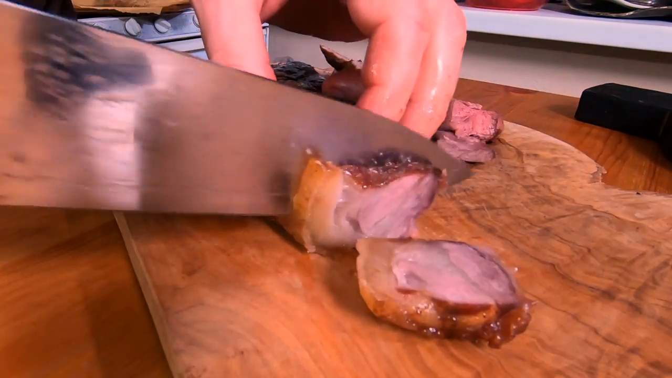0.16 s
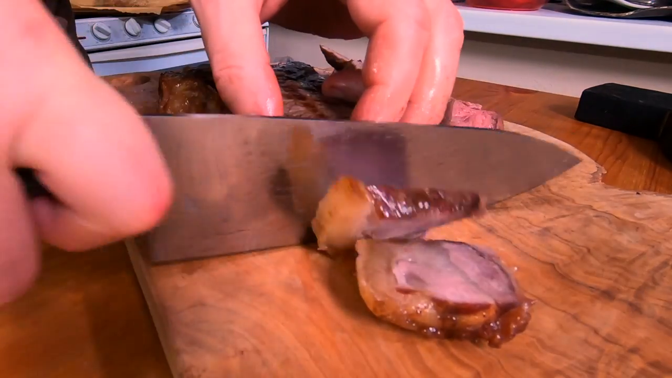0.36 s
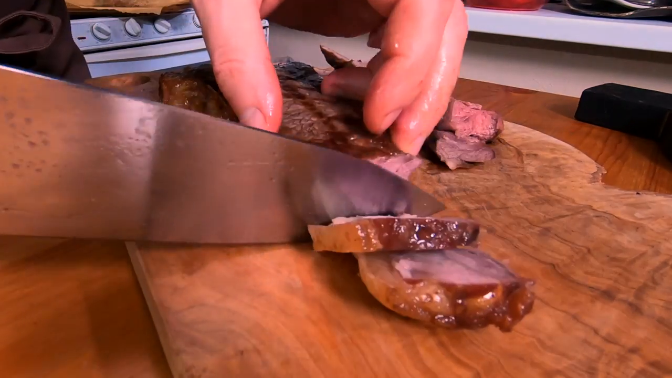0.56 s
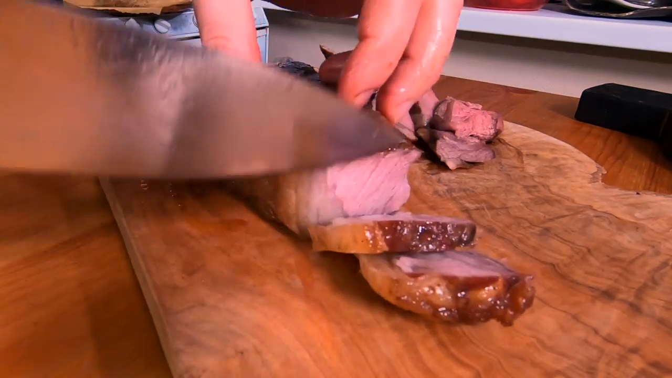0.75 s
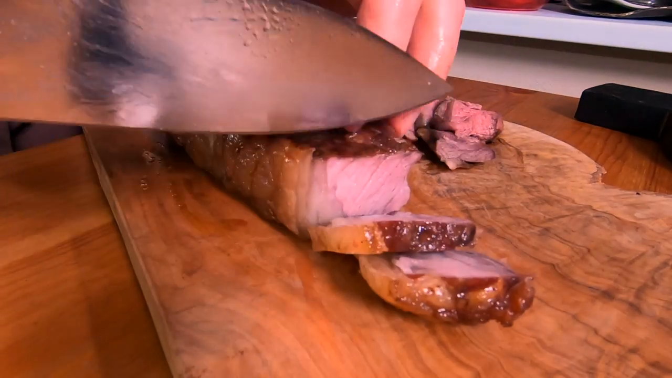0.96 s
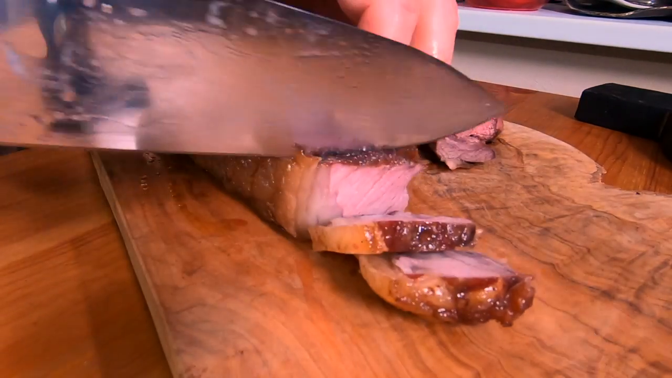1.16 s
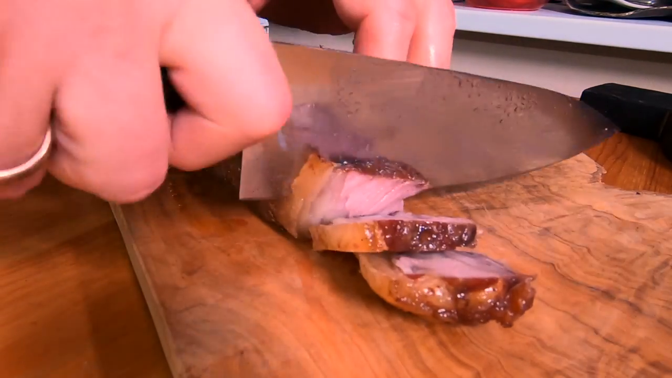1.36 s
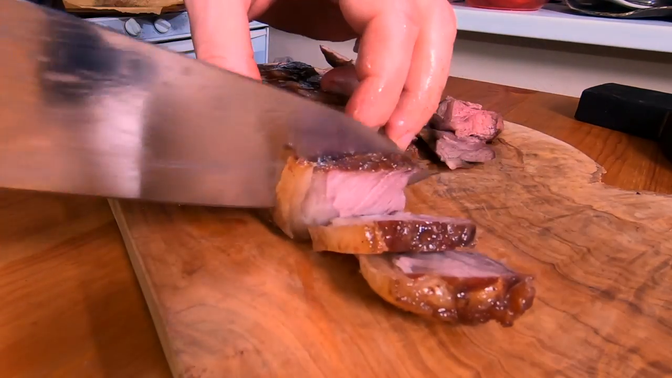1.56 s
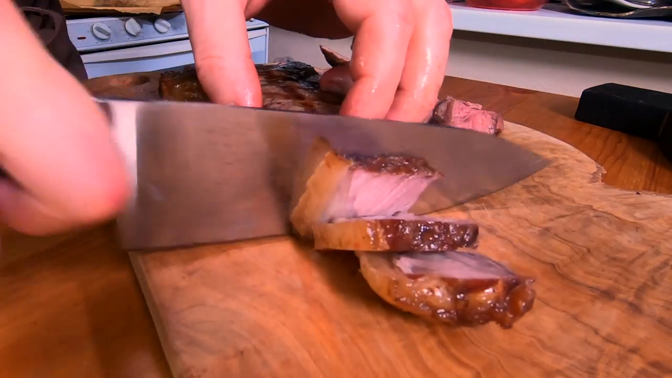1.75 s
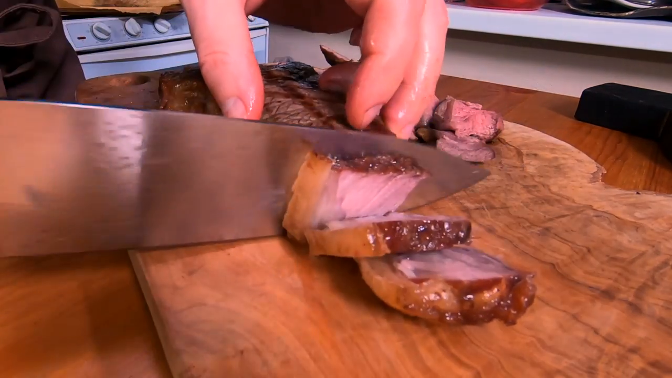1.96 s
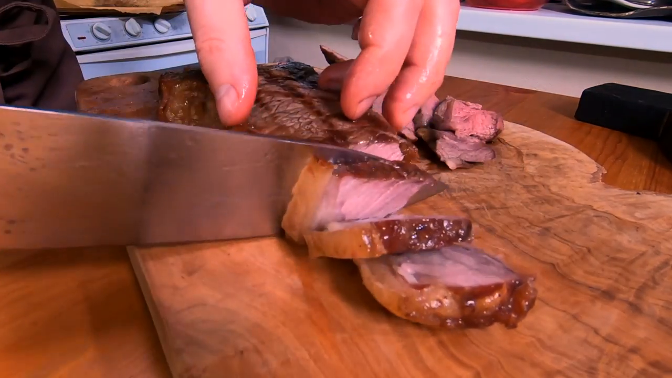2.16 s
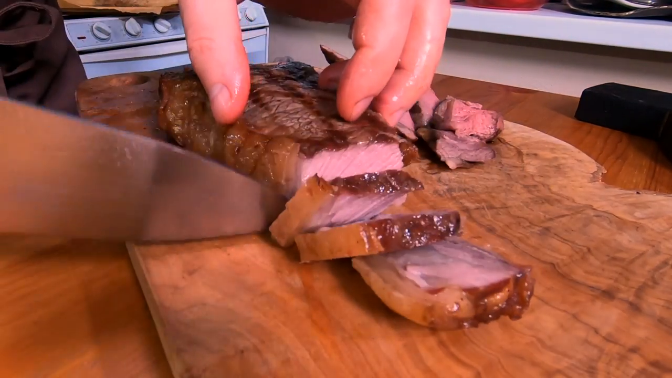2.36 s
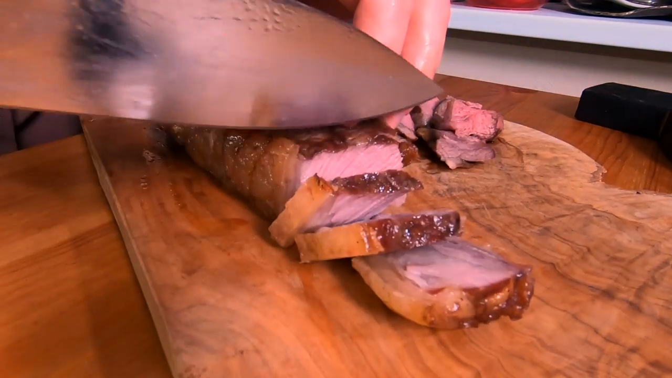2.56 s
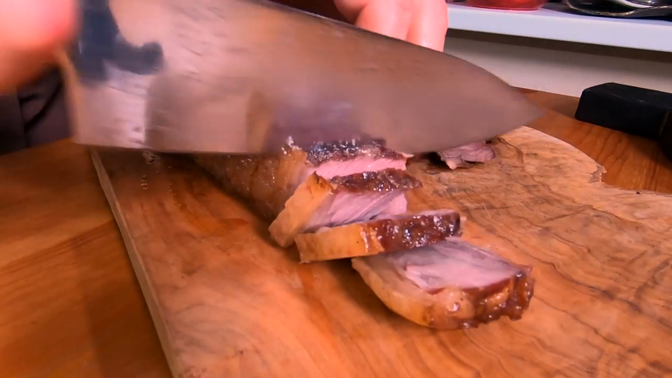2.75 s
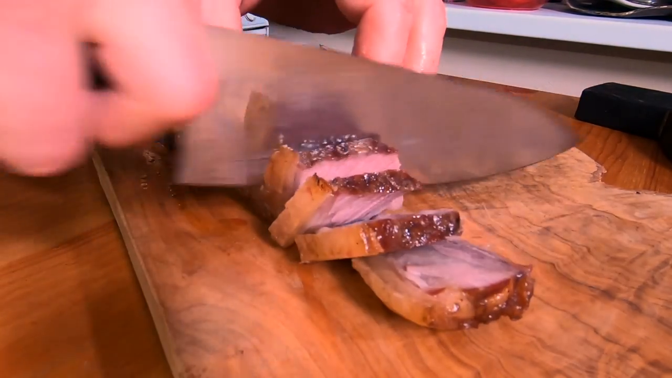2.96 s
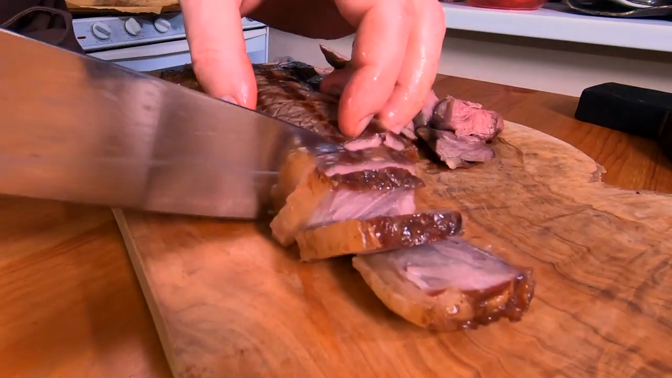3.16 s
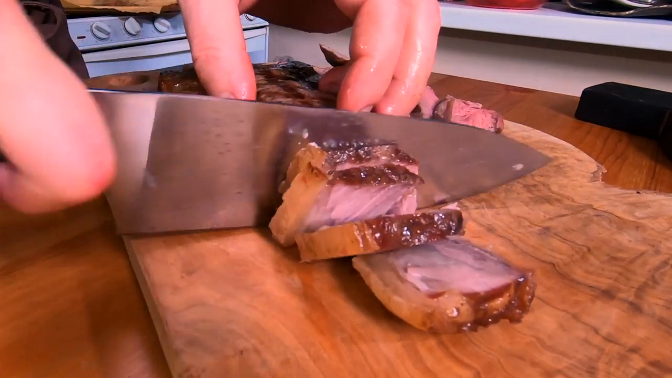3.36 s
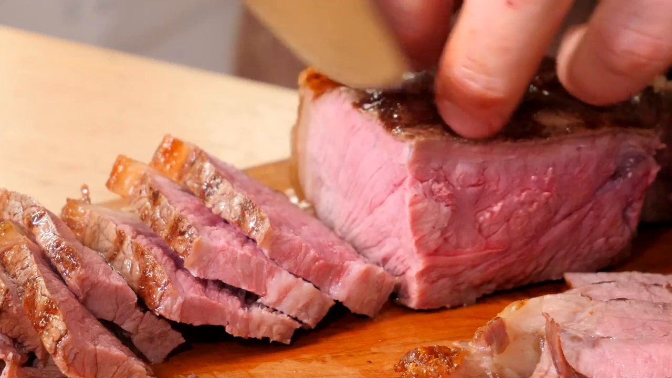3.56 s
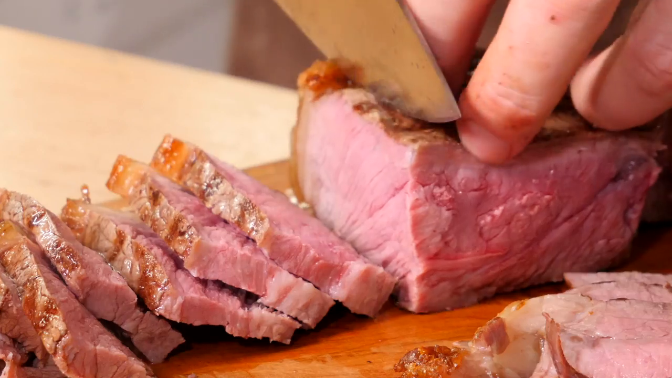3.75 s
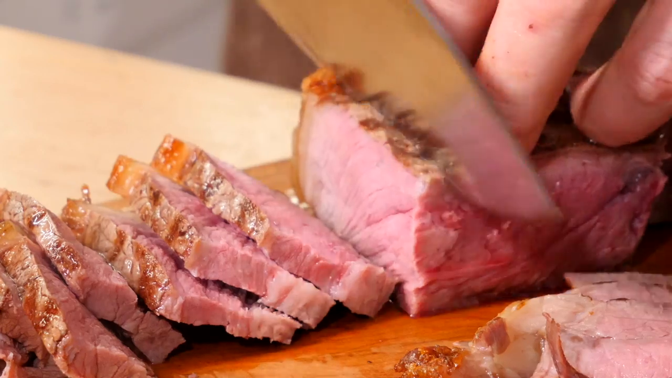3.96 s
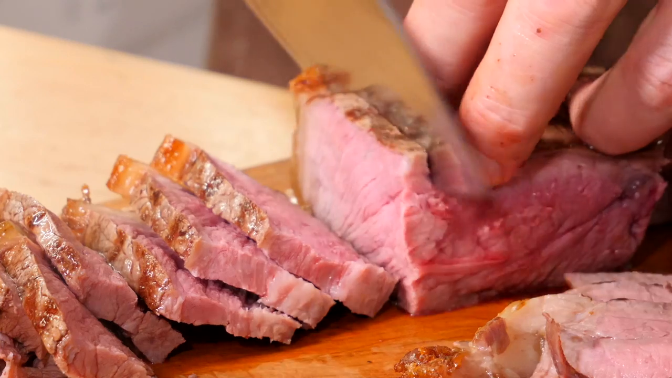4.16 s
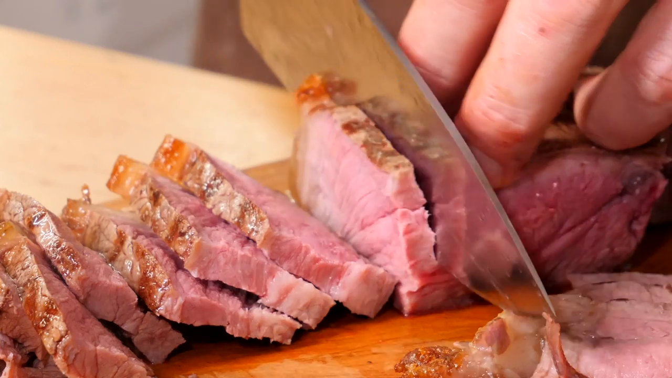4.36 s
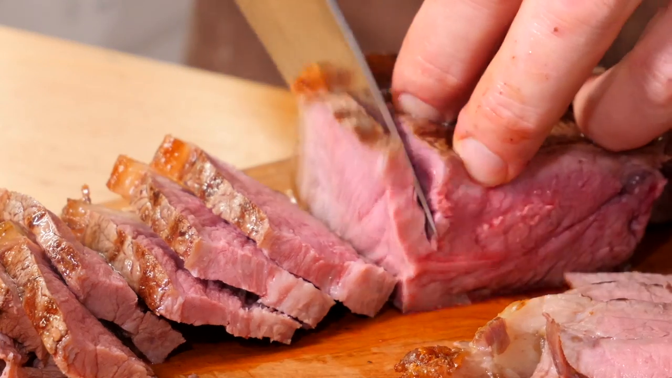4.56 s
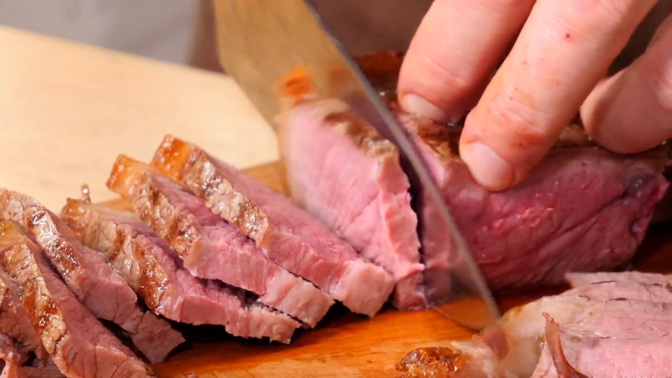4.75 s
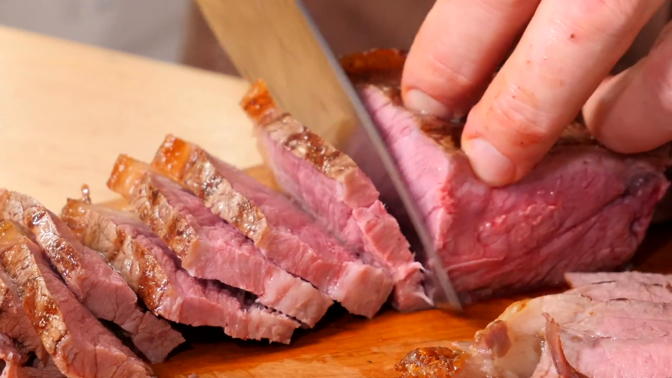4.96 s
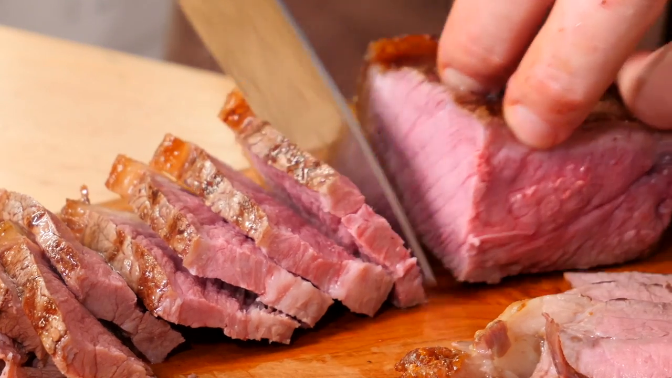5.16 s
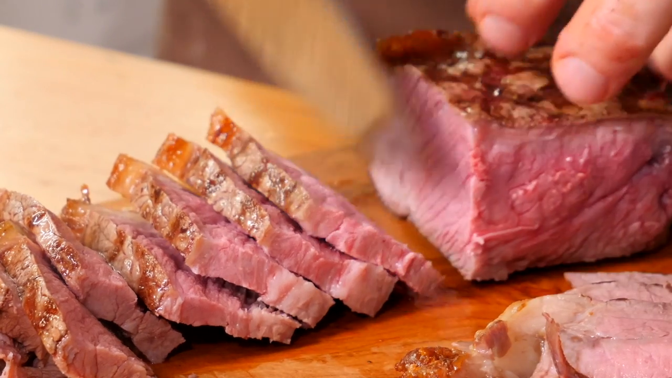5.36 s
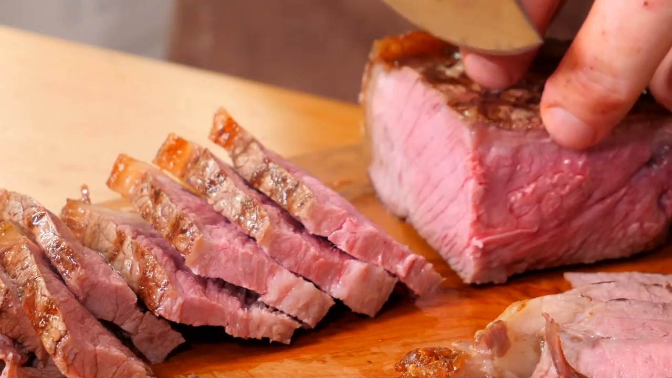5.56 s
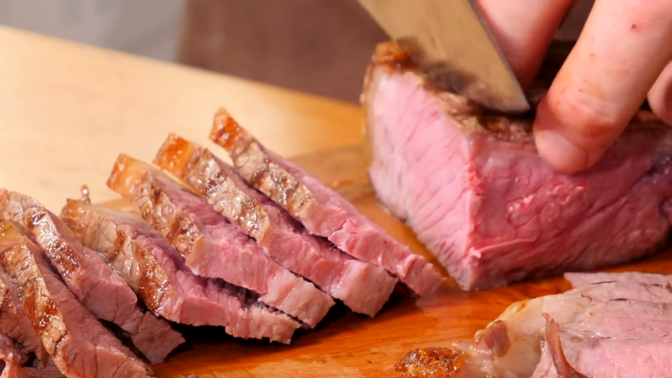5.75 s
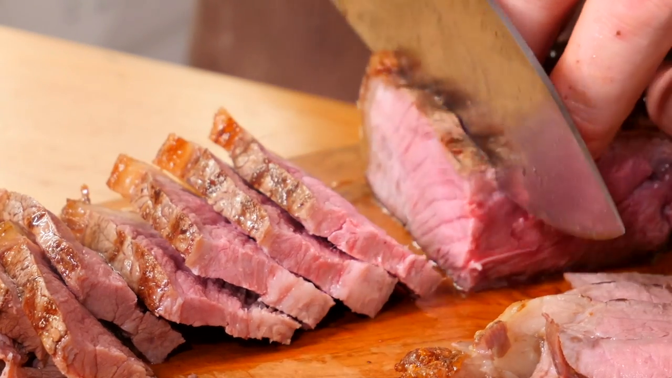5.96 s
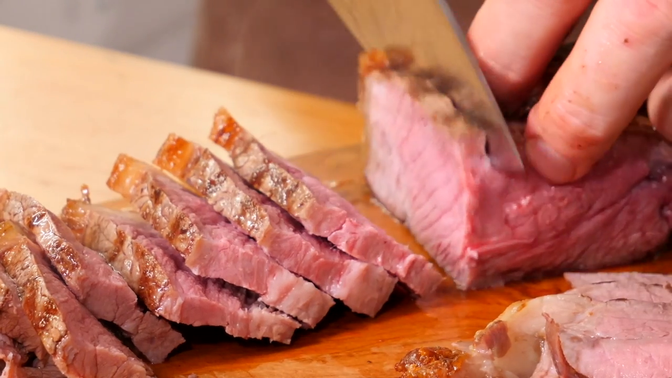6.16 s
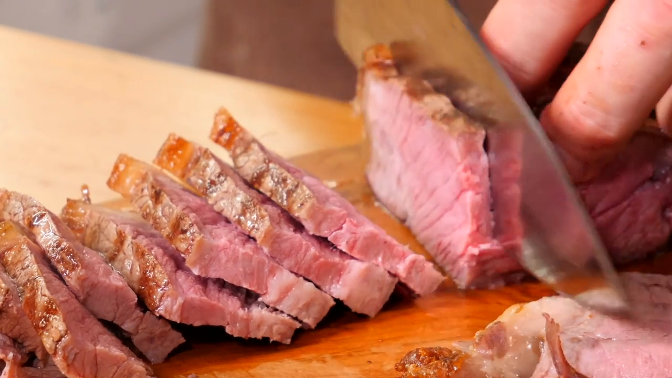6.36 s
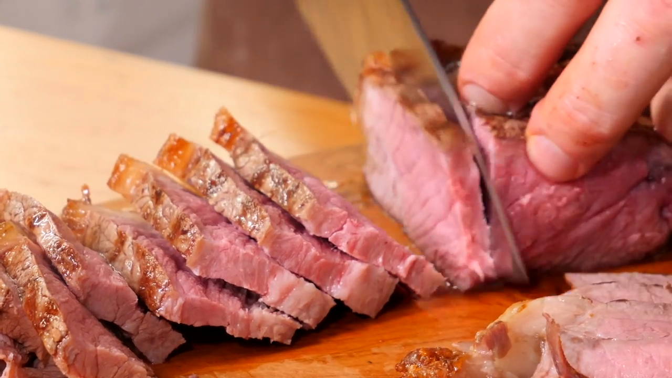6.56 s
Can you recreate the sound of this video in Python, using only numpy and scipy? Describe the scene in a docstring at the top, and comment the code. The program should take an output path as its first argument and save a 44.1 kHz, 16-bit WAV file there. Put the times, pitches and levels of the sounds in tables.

```python
"""A large knife saws through a cooked steak on a wooden board in a quiet kitchen.
From the first stroke the steel hisses in the wet meat, the edge rasps on the wood, and the pushing
hand makes the board rumble and thud. At 0.37 s the edge lands with a hard knock, then squeaks;
more knocks and squeaks follow. From 1.4 s fibres of the crust snap, thickest in two bouts of
harder sawing, at 4-4.8 s and, after a short rest, from 5.8 s to the end."""
import sys
import numpy as np
from scipy import signal
from scipy.io import wavfile
from scipy.ndimage import uniform_filter1d

SR = 44100
rng = np.random.default_rng(int(sys.argv[2]) if len(sys.argv) > 2 else 0)


def log_audio(samples):
    """Write samples as a 16-bit WAV file to the path given in sys.argv[1]."""
    # one column per channel
    frames = np.atleast_2d(samples).T
    # limit to full scale, then quantise
    limited = np.clip(frames, -1, 1)
    pcm = np.round(limited * 32767).astype(np.int16)
    wavfile.write(sys.argv[1], SR, pcm)


N = 290688

# strokes of the knife: start_s, speed_up_s, slow_down_s, hiss_db, pitch_hz, dull_db, drag_db, push_db,
# peakedness (0.3 even, 2 pointed)
KNIFE_STROKES = [(0, 0.16, 0.055, -51.5, 10800, -62, -60, -54.5, 0.5),
                 (.208, 0.16, 0.0093, -44, 11300, -49.5, -55.5, -46, 0.7),
                 (.44, 0.055, 0.14, -50.5, 10500, -61, -44, -52, 0.79),
                 (.69, 0.044, 0.068, -52.5, 9750, -58, -53, -49, 1.1),
                 (1.12, .15, .05, -63, 11900, -72, -84, -71.5, 0.64),
                 (1.291, 0.12, 0.066, -46, 10600, -58, -59, -53.5, 1.3),
                 (1.485, .065, 0.053, -51.5, 10600, -63, -78, -69, 0.43),
                 (1.604, 0.027, 0.1, -46, 10900, -76, -58, -55, 1.2),
                 (1.714, 0.071, 0.14, -44, 11100, -49.5, -53.5, -44, 0.77),
                 (1.933, 0.069, 0.13, -50, 10700, -68, -41, -52.5, .8),
                 (2.311, 0.0065, 0.13, -53.5, 11100, -59, -54, -55, 0.6),
                 (2.57, 0.032, 0.17, -65.5, 9300, -60, -66, -76, 0.48),
                 (2.809, 0.16, 0.049, -49.5, 10700, -58.5, -87, -53.5, 0.77),
                 (3.028, 0.066, 0.13, -49, 10600, -55.5, -54, -56.5, 0.23),
                 (3.234, 0.029, 0.2, -50, 10600, -56, -48, -44.5, .8),
                 (3.445, 0.12, 0.16, -51.5, 9900, -63, -44, -58, 0.7),
                 (3.92, 0.014, 0.077, -52.5, 12900, -60, -75, -51, .4),
                 (4.0, 0.048, 0.099, -42.5, 10700, -49, -65, -49.5, 1.7),
                 (4.146, 0.081, 0.088, -44, 11200, -44.5, -56, -43.5, 0.69),
                 (4.327, 0.0057, .128, -39.5, 11400, -45.5, -55.5, -40, 1),
                 (4.487, 0.1, 0.046, -48.5, 10000, -56, -65, -48, 0.21),
                 (4.65, 0.048, 0.031, -42.5, 9500, -64, -59, -44, .7),
                 (4.707, 0.016, 0.081, -38, 9800, -41, -45, -38, 1.2),
                 (4.813, 0.018, 0.13, -51.5, 9500, -47.5, -40, -58, 1.3),
                 (4.994, 0.041, 0.093, -54, 11400, -51.5, -47, -47.5, 0.65),
                 (5.134, 0.043, 0.16, -55, 11200, -57, -48, -56, 0.93),
                 (5.832, .17, 0.06, -45.5, 11200, -47.5, -65, -48, 1),
                 (6.09, 0.1, 0.039, -38.5, 10400, -42.5, -61.5, -48.5, 0.37),
                 (6.253, 0.015, .14, -38, 10700, -42.5, -55, -42, 0.78),
                 (6.39, 0.1, 0.11, -39, 10500, -53, -51, -44.5, 0.66)]
# modes of the wooden board, lowest first: pitch_hz, level_db, t60_s
BOARD_MODES = [(133.5, -17, 0.27), (176, -6.5, 0.089), (213, -2.5, 0.13), (359, -16.5, 0.1),
               (520, -16.5, 0.084), (592.4, -12.5, 0.067), (713, -13.5, 0.13), (815, -7, 0.05),
               (947, 4.5, 0.015), (962, -18, 0.067), (1080, -10.5, 0.031), (1120, -8, 0.017),
               (1480, -30, 0.052), (1603, -7.5, 0.028), (1660, -13, .05), (2400, -19, 0.0245)]
# crust fibres breaking: start_s, level_db, brightest_hz, thump_db (relative to the level)
FIBRE_SNAPS = [(1.423, -23, 10600, -17.5), (1.636, -30, 11200, -14), (2.677, -40, 9100, -15),
               (2.934, -32.5, 10600, -7), (3.067, -31, 11700, -30), (3.701, -42, 9700, -10),
               (3.929, -35, 12300, -27), (4.0663, -17, 10600, -38), (4.1535, -28.5, 11000, -29),
               (4.177, -22, 11000, -35), (4.232, -16.5, 12200, -25), (4.2653, -18, 13900, -11),
               (4.337, -11, 11700, -16), (4.363, -15.5, 12100, -36), (4.4048, -35, 10300, -12),
               (4.4194, -23, 10600, -21), (4.4328, -23.5, 10600, -30), (4.4428, -21.5, 10600, -23),
               (4.501, -32, 10100, -11), (4.6127, -24.5, 6500, -18), (4.626, -31, 9000, -11),
               (4.6924, -12.5, 8750, -20), (4.6958, -21, 8700, -26), (4.721, -13, 10700, -32),
               (4.843, -31, 3160, -20), (5.8346, -37, 5600, -25), (5.854, -35, 12200, -12),
               (5.887, -33, 7600, -8), (5.8962, -28.5, 13600, -14), (5.9678, -19.5, 10900, -26),
               (5.998, -19.5, 12200, -15), (6.0117, -17.5, 12200, -15.5), (6.03, -26.5, 10700, -13),
               (6.1097, -30, 10640, -5.5), (6.225, -38, 9500, -12), (6.264, -24, 12300, -8),
               (6.33, -29, 10800, -24), (6.3682, -8.5, 10600, -15), (6.3754, -27, 10900, -18),
               (6.3823, -13.5, 10600, -34), (6.413, -15.5, 10600, -9.5), (6.4426, -15.5, 10500, -43),
               (6.4546, -17, 10700, -33), (6.4803, -11.5, 10500, -22), (6.554, -17.5, 12400, -16)]


def from_db(db):
    """Decibels to gain."""
    return 10 ** (np.asarray(db) / 20)


def rms_one(x):
    """Scale to rms 1."""
    return x / np.sqrt(np.mean(x ** 2) + 1e-20)


def band(x, low_hz, high_hz):
    """Butterworth band-pass."""
    edges_hz = [low_hz, min(high_hz, .45 * SR)]
    return signal.sosfilt(signal.butter(2, edges_hz, "band", fs=SR, output="sos"), x)


def drift(rate_hz):
    """Smooth random wander of rms 1."""
    r = np.exp(-80 * np.pi * rate_hz / SR)
    slow = signal.lfilter([1], [1, -2 * r, r * r], rng.standard_normal(N // 40 + 2002))[2000:]
    return np.interp(np.arange(N) / 40, np.arange(len(slow)), rms_one(slow))


def ring(x, hz, t60):
    """One mode: a unit click starts a decaying sine of height 1."""
    r, w = from_db(-60 / (t60 * SR)), 2 * np.pi * hz / SR
    return signal.lfilter([0, np.sin(w)], [1, -2 * r * np.cos(w), r * r], x + 1e-18)


def resonance(x, hz, width_hz):
    """Two-pole peak of gain 1."""
    r, w = np.exp(-np.pi * width_hz / SR), 2 * np.pi * hz / SR
    return signal.lfilter([(1 - r * r) / 2, 0, (r * r - 1) / 2], [1, -2 * r * np.cos(w), r * r], x)


def linger(power, seconds):
    """One-pole smoothing that gives an envelope a tail."""
    keep = np.exp(-1 / (seconds * SR))
    return signal.lfilter([1 - keep], [1, -keep], power)


def friction(slips_per_s, spread_db, smooth):
    """Tiny stick-slip clicks over a smooth rub, as two independent streams."""
    sizes = from_db(spread_db * np.minimum(rng.exponential(1, (2, N)), 5))
    signs = rng.choice([-1, 1], (2, N))
    slips = sizes * signs * (rng.random((2, N)) < slips_per_s / SR)
    return rms_one(slips) + smooth * rng.standard_normal((2, N))


def room_tone(level_db=-55, flicker_db=1.5):
    """Room and preamp noise in third-octave bands, each flickering on its own."""
    # noise floor: frequency_hz, density_db
    spectrum = [(15, -31), (25, 1.5), (170, -6), (222, -3.5), (291, -5), (403, -6.5), (637, -5),
                (834, -8.5), (929, -10), (15800, -25.5)]
    hz, db = np.transpose(spectrum)
    edges = np.geomspace(hz[0], hz[-1], round(3 * np.log2(hz[-1] / hz[0])) + 1)
    out, noise = np.zeros(N), rng.standard_normal((2, N))
    for k, (low, high) in enumerate(zip(edges, edges[1:])):
        band_db = np.interp(np.log(low * high) / 2, np.log(hz), db)
        out += from_db(band_db + flicker_db * drift(8.1)) * band(noise[k % 2], low, high)
    return from_db(level_db) * rms_one(out)


def sawing_motion():
    """Hiss, drag and push swell with each stroke's speed; the loudest stroke leads the pitch."""
    cut_s = 3.598   # the sawing sound cuts off abruptly here, at an edit
    resting_drag_db, resting_push_db = -79.5, -59.5   # hand and blade never lie quite still
    powers = np.full((5, N), 1e-12)
    for start, up, down, hiss_db, hz, dull_db, drag_db, push_db, peakedness in KNIFE_STROKES:
        end = start + up + down
        heard_until = min(end, cut_s) if start < cut_s else end
        span = np.arange(max(round(start * SR), 0), min(round(heard_until * SR), N))
        progress = np.interp(span / SR, [start, start + up, end], [0, .5, 1])
        speed = np.abs(np.sin(np.pi * progress))
        heights = from_db(2 * np.array([hiss_db, hiss_db, dull_db, drag_db, push_db]))
        heights[1] *= hz   # pitch weighted by hiss power
        powers[:, span] += heights[:, None] * speed ** (2 * peakedness)
    hiss, weighted_pitch, dull = linger(powers[:3], seconds=0.004)
    sings_hz = weighted_pitch / hiss
    tears = tearing_power()
    hiss += tears
    dull += from_db(2 * -8) * tears   # the dull part of a tear is 8 dB softer
    drag = linger(powers[3], seconds=0.024)   # the wood rings on after the edge slows
    drag[round(cut_s * SR):round((cut_s + .3) * SR)] = 0
    drag += from_db(2 * resting_drag_db)
    push = linger(powers[4], seconds=0.043) + from_db(2 * resting_push_db)
    hiss_db, dull_db, drag_db, push_db = 10 * np.log10([hiss, dull, drag, push])
    return hiss_db, sings_hz, dull_db, drag_db, push_db


def blade(x, sings_hz, boost_db=11.5):
    """Broad steel resonances over a flat rustle; those near the free length's pitch sing out."""
    # resonances of the steel: pitch_hz, width_hz, level_db
    steel_modes = [(7730, 550, -7.5), (8400, 196, -16), (9500, 200, -11), (10600, 730, -8),
                   (12050, 290, -5), (13100, 370, -30), (15400, 320, -40)]
    out = .27 * band(x, 6500, 17000)
    for hz, width, db in steel_modes:
        near_db = boost_db * np.exp(-((hz - sings_hz) / 900) ** 2)
        out += from_db(db + near_db + 4.5 * drift(16)) * resonance(x, hz, width)
    return out


def slicing(hiss_db, sings_hz, dull_db):
    """Steel rubs through wet meat; its lower modes come and go as the meat's grip shifts."""
    # lower resonances of blade and meat: pitch_hz, width_hz, level_db
    dull_modes = [(2170, 260, 12), (3250, 2200, 4), (4630, 100, 6.5), (4960, 80, 7), (5830, 2100, 16),
                  (6900, 270, -10)]
    rub = friction(slips_per_s=2500, spread_db=4.5, smooth=0.96)[0] * from_db(1.2 * drift(35))
    steel = blade(rub, sings_hz)
    steel /= np.sqrt(uniform_filter1d(steel ** 2, size=4000) + 1e-12)   # hiss_db sets the slow level
    dull = .35 * band(rub, 1800, 7500)
    for hz, width, db in dull_modes:
        dull += from_db(db + 4 * drift(12)) * resonance(rub, hz, width)
    return from_db(hiss_db) * steel + from_db(dull_db) * rms_one(dull)


def wet_edge(hiss_db, flicker_db=6.5, pitch_spread=0.051):
    """Narrow high resonances of the wet edge, shifted in pitch and strength with every stroke."""
    # resonances of the edge: pitch_hz, width_hz, level_db
    edge_modes = [(5180, 260, -5), (6550, 230, -10.5), (7100, 180, -7), (7750, 100, -7), (8480, 380, -2),
                  (10100, 240, -4), (10700, 240, -9), (11900, 120, 4.5), (14000, 360, -0.5),
                  (15500, 89, -6)]
    out = np.zeros(N)
    rub = rng.standard_normal(N) * from_db(2.6 * drift(15))
    starts = [max(round(stroke[0] * SR), 0) for stroke in KNIFE_STROKES] + [N]
    for start, end in zip(starts, starts[1:]):
        for hz, width, db in edge_modes:
            detune, strength = rng.standard_normal(2)
            pitch_hz = min(hz * (1 + pitch_spread * detune), 15600)
            gain = from_db(db + flicker_db * np.tanh(strength))
            out[start:end] += gain * resonance(rub[start:end], pitch_hz, width)
    level_db = -27.5 + 0.51 * hiss_db   # half follows the hiss, so stands out in gentle strokes
    return from_db(level_db) * (hiss_db > -100) * rms_one(out)


def drag_and_rumble(drag_db, push_db):
    """The dragging edge rasps in the wood; the pushing hand stirs the low board modes."""
    # resonances of the edge on wet wood: pitch_hz, width_hz, level_db
    rasp_modes = [(554, 71, 1.5), (850, 160, 7), (1225, 61, -4.5), (1688, 120, 0.5), (2400, 120, -7),
                  (3250, 96, -12)]
    edge, hand = friction(slips_per_s=900, spread_db=0, smooth=0.73)
    rasp = .17 * band(edge, 400, 2200)
    for hz, width, db in rasp_modes:
        rasp += from_db(db + 3 * drift(7)) * resonance(edge, hz, width)
    rumble = sum(from_db(db + 3.1 * drift(0.8)) * ring(hand, hz, 0.13 * t60) / hz ** 2.2
                 for hz, db, t60 in BOARD_MODES[:4])
    rumble = signal.sosfilt(signal.butter(2, 85, "high", fs=SR, output="sos"), rumble)
    return from_db(drag_db) * rms_one(rasp) + from_db(push_db) * rms_one(rumble)


def thuds(trim_db=-1, reach_hz=39.5):
    """A soft contact rings the lowest board modes, most of all those near its own pitch."""
    # hand and blade pressing into the board: start_s, level_db, pitch_hz
    presses = [(0.223, -34, 143), (0.251, -39, 125), (0.332, -32, 124), (0.428, -30, 205),
               (0.464, -25, 196), (0.486, -29.5, 203), (0.749, -41, 115), (1.361, -41, 134),
               (1.398, -36, 125), (1.437, -40, 215), (1.737, -35, 160), (2.013, -38, 196),
               (2.892, -43, 127), (2.949, -47, 170), (3.425, -35, 180), (4.37, -32, 161), (4.404, -34, 137),
               (4.718, -28.5, 212), (4.754, -26.5, 213), (5.127, -38.5, 137), (5.336, -42, 106),
               (5.398, -46.5, 195), (6.222, -34.5, 228), (6.298, -48, 175)]
    start_s, db, pitch_hz = np.transpose(presses)
    out = np.zeros(N)
    for hz, _, t60 in BOARD_MODES[:3]:
        nearness = np.exp(-((hz - pitch_hz) / reach_hz) ** 2)
        clicks = np.zeros(N)
        clicks[(start_s * SR).astype(int)] = from_db(db + trim_db) * nearness
        out += ring(clicks, hz, min(t60, .12))
    return band(out, 90, 250)


def knocks(rebound_s=0.002182, low_lag_s=0.0046, tail_db=-21.5):
    """The landing edge kicks every board mode; where it lands sets the balance from low to high."""
    # the edge hits the board: start_s, level_db, lowest_db, low_db, middle_db, upper_db,
    # contact_ms, crack_db, rebound_db
    landings = [(0.3703, -2, -11.5, -17.5, -4.5, -1, 0.58, -16, -22),
                (1.8335, -5.5, -4, -9, 0.5, -5.5, 0.92, -50, 0),
                (2.3185, -11.5, -4, -3, 6.5, -7, 0.9, -36, -5),
                (3.2943, -8, -3.5, -12, 3.5, 1, 0.92, -50, -2),
                (4.844, -35, -18, -16, -36, 2, 0.36, -21, 0), (4.8500, -24, 1.5, 2, 5, 1.5, 0.48, -55, 1),
                (4.973, -39.5, 4, 0, 8, -23, 0.56, -63, -3)]
    # table and walls answering a knock: pitch_hz, width_hz, level_db, t60_s
    tail_bands = [(175, 60, 1, 0.29), (215, 84, 13, 0.23), (373, 38, -8, 0.2), (509, 89, 4.5, 0.21),
                  (740, 140, -4, 0.36), (934, 34, -12.5, 0.5), (1083, 380, -1.5, 0.38),
                  (1720, 160, -19, 0.075), (2400, 230, -19.5, 0.048)]
    out, length = np.zeros(N), round(.7 * SR)
    t = np.arange(length) / SR
    balance_log_hz = np.log([175, 226, 570, 940])
    for start_s, level_db, *balance_db, contact_ms, crack_db, rebound_db in landings:
        push = np.sin(np.pi * np.clip(1000 * t / contact_ms, 0, 1)) ** 2
        kick = np.diff(push / push.sum(), prepend=0)   # the air follows the board's speed
        bounced = kick + from_db(rebound_db) * np.roll(kick, round(rebound_s * SR))
        late = np.roll(kick, round(low_lag_s * SR))   # slow bending waves arrive later, as one push
        share_db = lambda hz: level_db + np.interp(np.log(hz), balance_log_hz, balance_db)
        hit = from_db(crack_db) * ring(t == 0, hz=3000, t60=0.0023)   # steel bites wood
        for hz, db, t60 in BOARD_MODES:
            mode = ring(late if hz < 450 else bounced, hz, t60) * SR / (2 * np.pi * hz)
            hit -= from_db(share_db(hz) + db) * mode
        attack = 1 - np.exp(-t / 0.00097)
        for hz, width, db, t60 in tail_bands:
            decay = from_db(share_db(hz) + db + tail_db - 60 * t / t60)
            wash = resonance(resonance(rng.standard_normal(length), hz, width), hz, 2 * width)
            hit += attack * decay * rms_one(wash)
        at = round(start_s * SR)
        out[at:at + length] += hit
    return out


def squeaks():
    """Friction noise catches for a moment in one narrow resonance, with a broader scrape around it."""
    # brief squeaks of the edge: start_s, length_s, pitch_hz, level_db
    catches = [(0.525, 0.085, 1220, -47), (2.586, 0.052, 320, -55), (3.03, 0.047, 3090, -49),
               (3.49, 0.088, 3300, -54.5), (4.764, 0.02, 3250, -46.5), (4.832, 0.0089, 2400, -41),
               (5.07, 0.054, 930, -48.5), (5.254, 0.089, 2000, -58)]
    out, noise = np.zeros(N), rng.standard_normal(N)
    for start_s, length_s, hz, db in catches:
        at, size = round(start_s * SR), round(length_s * SR)
        tone = resonance(resonance(noise[at - 2000:at + size], hz, 92), hz, 320)[2000:]
        scrape = band(noise[at:at + size], 0.93 * hz, 1.22 * hz)
        swell = from_db(db) * np.sqrt(np.hanning(size))
        out[at:at + size] += swell * (rms_one(tone) + 0.5 * rms_one(scrape))
    return out


def snaps(sings_hz, decay_s=0.001):
    """A breaking fibre is a ragged noise burst that rings the blade and thumps into the board."""
    bursts, kicks = np.zeros(N), np.zeros(N)
    t = np.arange(SR // 40) / SR
    shape = (len(FIBRE_SNAPS), len(t))
    ragged = rng.standard_normal(shape) * rng.exponential(1, shape) ** 0.25
    for (start_s, level_db, hz, thump_db), noise in zip(FIBRE_SNAPS, ragged):
        burst = noise * np.sqrt(t) * np.exp(-t / decay_s)
        burst = 0.54 * band(burst, 1700, 20000) + band(burst, 0.6 * hz, 1.46 * hz)
        at = round(start_s * SR)
        bursts[at:at + len(t)] += (from_db(level_db) * burst / np.abs(burst).max())[:N - at]
        kicks[at] += from_db(level_db + thump_db)
    thumps = 12 * band(kicks, 73, 3000)
    wood = sum(from_db(db - 7.5) * ring(kicks, hz, t60) for hz, db, t60 in BOARD_MODES[:6])
    return 0.49 * bursts + 0.8 * blade(bursts, sings_hz) + thumps + wood


def tearing_power(trim_db=-18.5, rise_s=0.0012, fade_s=0.0058):
    """Power envelope of the short tearing hiss that each snap leaves behind."""
    start_s, level_db = np.transpose(FIBRE_SNAPS)[:2]
    kicks = np.zeros(N)
    kicks[(start_s * SR).astype(int)] = from_db(2 * (level_db + trim_db)) * fade_s * SR
    return linger(linger(kicks, fade_s), rise_s)


def scene():
    """Knife, meat and board over the room tone, in mono."""
    hiss_db, sings_hz, dull_db, drag_db, push_db = sawing_motion()
    room = room_tone()
    board = knocks() + thuds() + drag_and_rumble(drag_db, push_db)
    knife = slicing(hiss_db, sings_hz, dull_db) + wet_edge(hiss_db) + snaps(sings_hz) + squeaks()
    return (knife + board + room)[None]


def record(dry):
    """Clip at full scale, then cut the top with two steep low-passes."""
    top_cut = signal.cheby2(8, 45, 17000, fs=SR, output="sos")
    steep_edge = signal.ellip(8, .3, 22, 15750, fs=SR, output="sos")
    return signal.sosfilt(steep_edge, signal.sosfilt(top_cut, np.clip(dry, -1, 1)))


dry = scene()
out = record(dry)
log_audio(out)
```